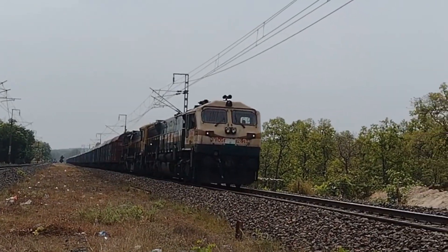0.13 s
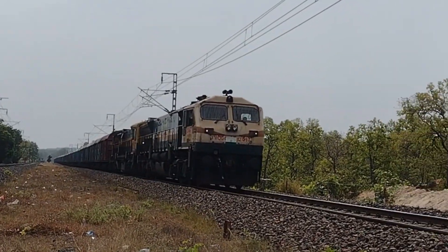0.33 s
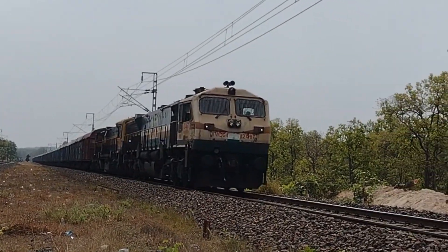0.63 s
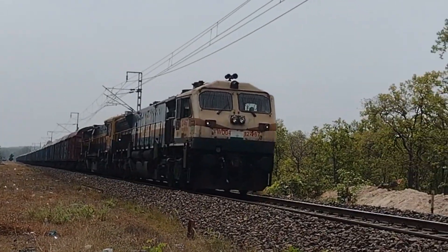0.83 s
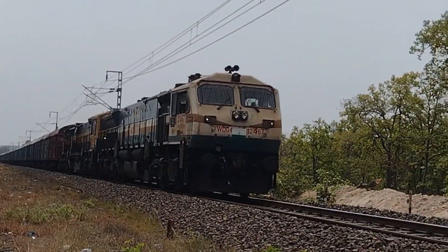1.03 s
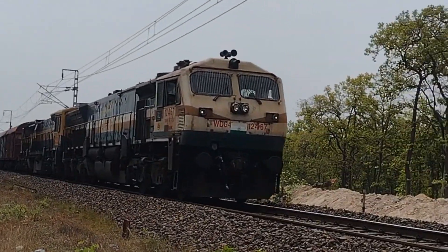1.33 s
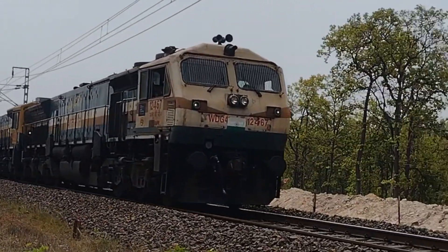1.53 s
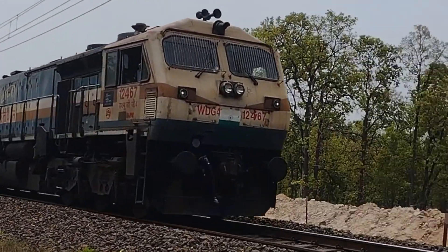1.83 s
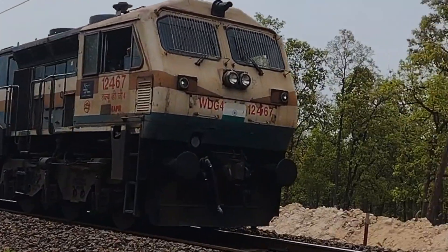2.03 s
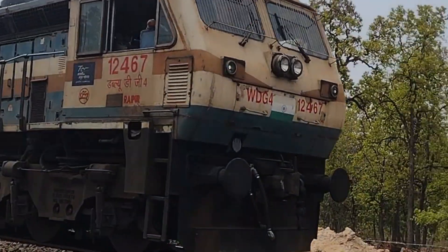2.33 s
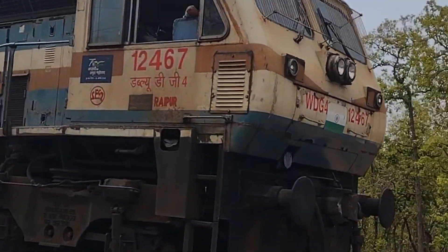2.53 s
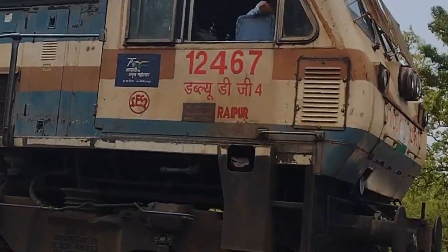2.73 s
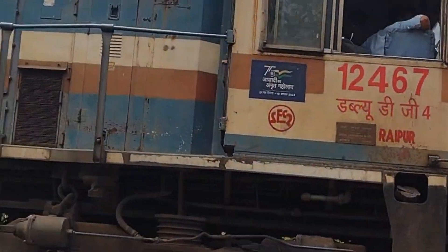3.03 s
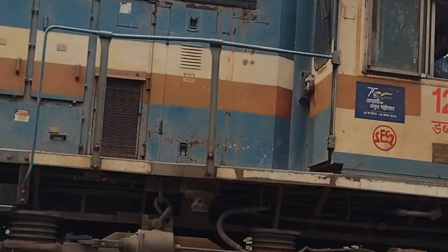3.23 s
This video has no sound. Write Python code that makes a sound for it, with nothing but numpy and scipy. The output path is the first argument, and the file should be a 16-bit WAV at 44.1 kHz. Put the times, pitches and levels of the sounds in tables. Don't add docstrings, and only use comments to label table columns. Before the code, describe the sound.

A diesel locomotive approaches and passes close by, its throb and whine swelling into a roar.

```python
import sys
import numpy as np
from scipy import signal
from scipy.fft import rfft, irfft, next_fast_len
from scipy.io import wavfile
from scipy.ndimage import uniform_filter1d, map_coordinates

SR = 44100
rng = np.random.default_rng(int(sys.argv[2]) if len(sys.argv) > 2 else 0)


def invert_db(level):
    return 10 ** (np.asarray(level, dtype=float) / 20)


def transcribe(u):
    v = np.clip(np.atleast_2d(u).T, -1, 1)
    q = np.round(v * 32767).astype(np.int16)
    wavfile.write(sys.argv[1], SR, q)


N = 149058

# start_s, level_db
LOCO_APPROACH = [(0, -48), (.5, -45.5), (1.2, -44), (1.8, -42), (2.3, -38.5), (2.7, -36), (3.0, -33),
                 (3.2, -30.5), (3.38, -28)]
# start_s, level_db
WHEEL_APPROACH = [(0, -43), (.5, -42), (1.0, -39), (1.5, -35), (2.0, -29.5), (2.4, -27.5), (2.9, -25.5),
                  (3.38, -27)]
# crank_multiple, far_level_db (rms), growth (dB per dB of closeness)
EXHAUST_ORDERS = [(5, -38, -.5), (6, -41, .3), (7, -35, .1), (8, -23, .1), (9, -35, .5), (11, -44, .3),
                  (13, -33, .6), (15, -28, .3), (16, -39, .55), (17, -37, .35), (18, -48, .3), (24, -43, 0),
                  (32, -52, .8)]
# pitch_hz, far_level_db (rms), growth (dB per dB)
FAN_HUMS = [(39.9, -47, 1.35), (62.3, -43, .5), (77.1, -34, .5), (87.1, -35, .3)]
# start_s, mesh_level_db, side_level_db
GEAR_LEVELS = [(0, -54, -58), (.3, -45, -52), (1.2, -43, -51), (1.6, -50, -49), (2.05, -50, -47),
               (2.3, -33, -38), (2.75, -35.5, -41), (3.05, -45, -40), (3.3, -35, -41)]
# offset_turns (turn rates from the mesh tone), level_db
GEAR_SIDES = [(-3, -11), (-1, -10), (1, 0), (2, -4), (3, -8), (4, -13)]
# pitch_hz, width_hz, far_level_db (rms), growth (dB per dB), pitch_sag (fraction)
WHINE_LINES = [(1003, 18, -53, .95, .004), (1070, 24, -56, 1.05, .004), (1805, 45, -66, 1.5, .008),
               (2136, 28, -60, .95, .004), (2910, 55, -70, 1.4, .01), (3060, 50, -62, .6, .008),
               (4350, 30, -72, 1.4, .008), (499, 24, -62, 1.4, .006), (4690, 45, -64, .5, .01),
               (5510, 150, -58, 1.05, .008), (1410, 50, -52, .9, .008), (1530, 70, -62, 1.1, .008),
               (2290, 20, -72, 1.2, .008), (7300, 200, -70, 1.2, .008)]
# start_s, motor_level_db, turbo_level_db
BLOWER_LEVELS = [(0, -66, -59), (.8, -61, -56), (1.6, -59, -55), (1.9, -57, -48), (2.55, -52, -52),
                 (2.8, -43, -49), (3.0, -46, -48), (3.15, -40, -46), (3.38, -43, -38)]
# far_pitch_hz, near_pitch_hz, width_hz, far_level_db (rms), growth (dB per dB)
RAIL_RINGS = [(698, 790, 48, -46.5, .92), (635, 700, 60, -49, .75), (740, 890, 60, -54, 1.05)]
# pitch_hz, level_db (per Hz)
RUMBLE_COLOUR = [(20, -4), (30, 0), (50, -3), (68, -5), (90, -7), (125, -5), (170, -9), (260, -26)]
ROAR_COLOUR = [(110, -12.5), (200, 2.5), (320, 0.5), (500, -8), (800, -17.5), (1100, -15), (1600, -25),
               (2500, -31.5)]
BODY_COLOUR = [(300, -14.5), (500, -2.5), (700, 2), (900, -5), (1100, -4), (1500, -4.5), (1900, -18),
               (2600, -26)]
HISS_COLOUR = [(1300, -12), (2000, 1.5), (2600, -3), (3500, -2), (5000, -3.5), (6400, -7), (7400, -8.5),
               (8900, -10)]
# start_s (centre of the swell), level_db, pitch_hz, length_s
RAIL_THUDS = [
    (.5, -30, 165, .04),
    (1.9, -35, 255, .1),
    (2.08, -35, 215, .06),
    (2.68, -30, 210, .04),
    (2.85, -32, 280, .05),
    (3.1, -30, 250, .1),
]
# start_s, level_db (peak), length_s
STEEL_CLINKS = [(1.953, -29, .008), (2.045, -40, .007), (2.34, -39, .006), (2.675, -35, .012),
                (2.728, -28, .012), (2.74, -29, .012), (2.83, -35, .006), (2.984, -28, .008),
                (2.995, -32, .007), (3.026, -27, .007), (3.155, -32, .007)]
# pitch_hz, level_db
STEEL_COLOUR = [(4500, -14.5), (5800, -2), (6800, -13.5), (7300, 1), (7700, -13.5), (8900, -6.5)]
# pitch_hz, level_db
MIC_EDGE = [(7500, 1), (7800, -3), (8000, -10), (8250, -16.5), (8450, -30.5), (8520, -42), (8600, -77)]


def unit(x):
    return x / np.sqrt(np.mean(np.abs(x) ** 2) + 1e-20)


def curves(rows):
    s, *cols = np.transpose(rows)
    return [np.interp(np.arange(N) / SR, s, c) for c in cols]


def closeness(rows):
    db, = curves(rows)
    return db - db[0]


def wobble(rate):
    return map_coordinates(rng.standard_normal(400), [np.arange(N) * min(rate, 100) / SR])


def coloured(x, points, ends=-120):
    m = next_fast_len(N + 8192)
    f, db = np.transpose(points)
    log_hz = np.log(np.fft.rfftfreq(m, 1 / SR) + 1)
    gain_db = np.interp(log_hz, np.log(f), db, left=ends, right=-120)
    return irfft(rfft(x, m) * invert_db(gain_db), m)[:N]


def rush(points, patchy_db):
    z = signal.stft(rng.standard_normal(N + 512), nperseg=512)[2]
    across_pitch = uniform_filter1d(rng.standard_normal(z.shape), size=6, axis=0)
    patches = unit(uniform_filter1d(across_pitch, size=12, axis=1))
    noise = signal.istft(z * invert_db(patchy_db * patches), nperseg=512)[1][:N]
    return unit(coloured(noise, points))


def turns(hz, sag, pass_s, sag_s):
    t = np.arange(N) / SR
    passed = 1 / (1 + np.exp((pass_s - t) / sag_s))
    return 2 * np.pi * np.cumsum(hz * (1 - sag * passed)) / SR


def fuzzy(phase, width_hz):
    k = np.exp(-np.pi * abs(width_hz) / SR)
    z = rng.standard_normal((2, N + SR))
    for _ in range(2):
        z = signal.lfilter([1 - k], [1, -k], z)
    return unit(z[0, SR:] * np.cos(phase) + z[1, SR:] * np.sin(phase))


def engine(near, wheels):
    crank_hz, sway_db, sway_rate = 6.343, 2.2, 2.2
    one_hz = turns(1, sag=.014, pass_s=3.3, sag_s=.15)
    tones = [(k * crank_hz, db, growth * wheels) for k, db, growth in EXHAUST_ORDERS]
    tones += [(hz, db, growth * near) for hz, db, growth in FAN_HUMS]
    top = max(db for _, db, _ in tones)
    mix = 0
    for hz, db, gain_db in tones:
        sway = sway_db * (.3 + min(top - db, 12) / 14) * wobble(sway_rate)
        drift = .04 * (top - db) * wobble(2.5)
        phase = hz * one_hz + rng.uniform(0, 2 * np.pi) + drift
        mix = mix + 2 ** .5 * invert_db(db + gain_db + sway) * np.sin(phase)
    return mix


def gears():
    mesh_hz, turn_hz, turn_at_s = 1399.6, 8.68, .247
    mesh_db, side_db = curves(GEAR_LEVELS)
    mesh = turns(mesh_hz, sag=0.01078, pass_s=3.1, sag_s=0.458) + .35 * wobble(8)
    turn = 2 * np.pi * turn_hz * (np.arange(N) / SR - turn_at_s) + .25 * wobble(3)
    sides = 0
    for k, db in GEAR_SIDES:
        level = invert_db(db + 2.5 * wobble(4))
        sides = sides + level * np.cos(mesh + k * turn + .35 * abs(k) * wobble(5))
    mesh_tone = invert_db(mesh_db + 1.5 * wobble(4)) * np.cos(mesh)
    return 2 ** .5 * (mesh_tone + invert_db(side_db) * sides)


def whines(near):
    mix = 0
    for hz, width_hz, db, growth, sag in WHINE_LINES:
        level = invert_db(db + growth * near + 0.53 * wobble(2.5))
        mix = mix + level * fuzzy(turns(hz, sag, pass_s=3.15, sag_s=0.23), width_hz)
    return mix


def sing(phase, width_hz):
    tone = 2 ** .5 * np.cos(phase + .8 * wobble(width_hz))
    return unit(tone + .7 * fuzzy(phase, 2 * width_hz))


def blowers():
    motor_db, turbo_db = curves(BLOWER_LEVELS)
    motor = sing(turns(3596, sag=.02, pass_s=3.17, sag_s=.16), width_hz=18)
    turbo = sing(turns(5613, sag=.016, pass_s=3.05, sag_s=.25), width_hz=22)
    return invert_db(motor_db) * motor + invert_db(turbo_db) * turbo


def rails(wheels):
    climb_s, climb_over_s = 2.7, .2
    share = 1 / (1 + np.exp((climb_s - np.arange(N) / SR) / climb_over_s))
    mix = 0
    for far_hz, near_hz, width_hz, db, growth in RAIL_RINGS:
        phase = 2 * np.pi * np.cumsum(far_hz + (near_hz - far_hz) * share) / SR
        mix = mix + invert_db(db + growth * wheels) * fuzzy(phase, width_hz)
    return mix


def roar(near, wheels):
    swell_db = .3 * wobble(4) + .55 * wobble(13) + .6 * wobble(30)
    rumble = invert_db(-33 + .35 * near) * rush(RUMBLE_COLOUR, patchy_db=-2.14)
    low_roar = invert_db(-47 + 1.317 * near) * rush(ROAR_COLOUR, patchy_db=-0.14)
    body = invert_db(-42.5 + 0.75 * wheels + .4 * swell_db) * rush(BODY_COLOUR, patchy_db=1.16)
    hiss = invert_db(-47.5 + 1.046 * near + swell_db) * rush(HISS_COLOUR, patchy_db=-0.63)
    return rumble + low_roar + body + hiss


def thuds():
    t = np.arange(N) / SR
    mix = 0
    for s, db, hz, length in RAIL_THUDS:
        swell = np.exp(-((t - s) / length) ** 2)
        mix = mix + invert_db(db) * swell * fuzzy(2 * np.pi * hz * t, 0.3 * hz)
    return mix


def clinks():
    t = np.arange(N) / SR
    shape = sum(invert_db(db) * (t > s) * np.exp(-np.abs(t - s) / length) for s, db, length in STEEL_CLINKS)
    return shape * .6 * unit(coloured(rng.standard_normal(N), STEEL_COLOUR))


def scene():
    near, wheels = closeness(LOCO_APPROACH), closeness(WHEEL_APPROACH)
    machine = engine(near, wheels) + gears() + whines(near) + blowers()
    track = rails(wheels) + roar(near, wheels) + thuds() + clinks()
    return (machine + track)[None]


def top_cut(x):
    return signal.sosfilt(signal.butter(12, 8750, fs=SR, output="sos"), x)


def record(dry):
    limit, knee = .78, 4
    soft = dry[0] / (1 + np.abs(dry[0] / limit) ** knee) ** (1 / knee)
    mix = coloured(soft, MIC_EDGE, ends=0)[None]
    return top_cut(mix)


dry = scene()
out = record(dry)
transcribe(out)
```